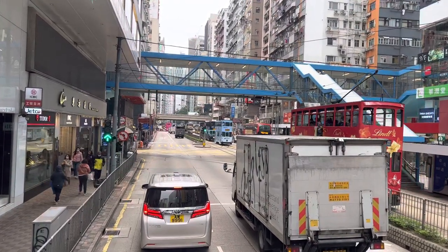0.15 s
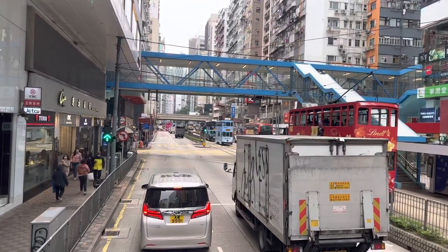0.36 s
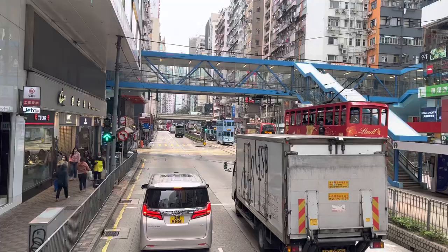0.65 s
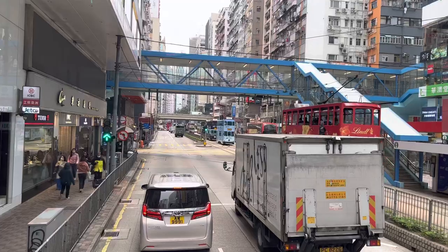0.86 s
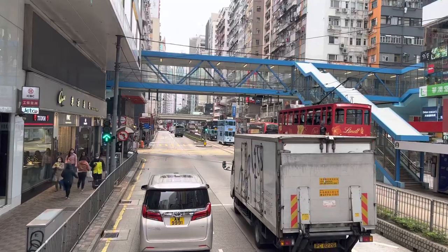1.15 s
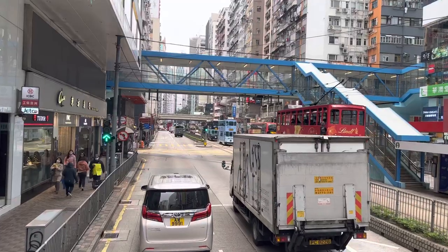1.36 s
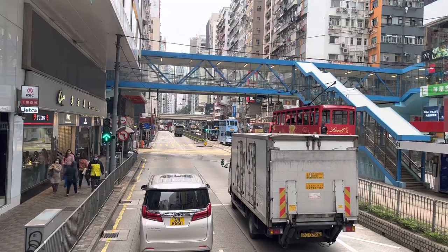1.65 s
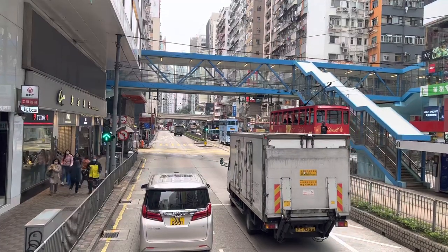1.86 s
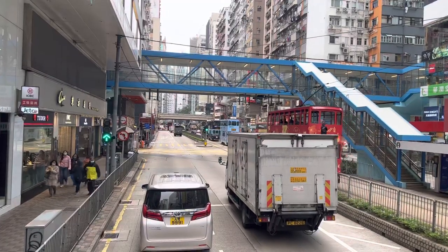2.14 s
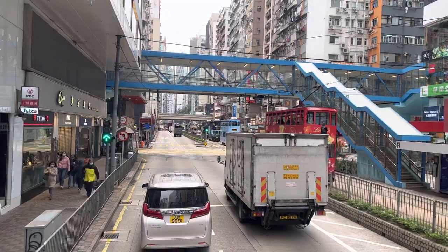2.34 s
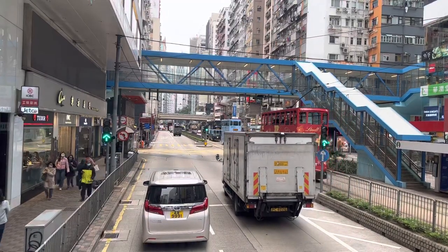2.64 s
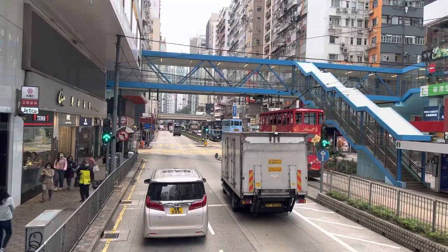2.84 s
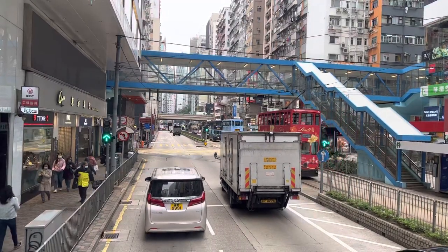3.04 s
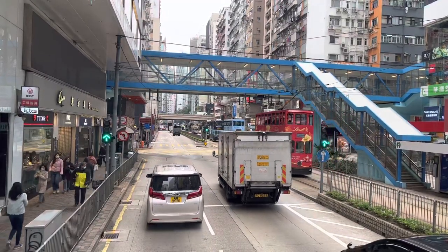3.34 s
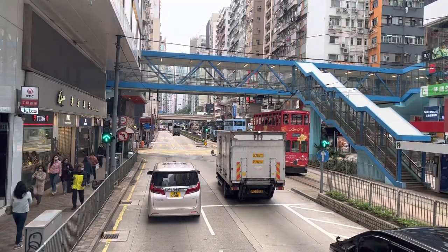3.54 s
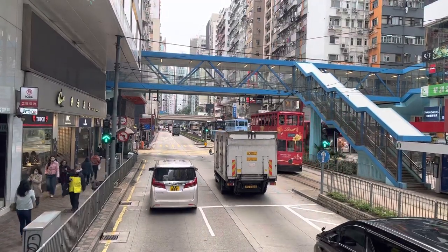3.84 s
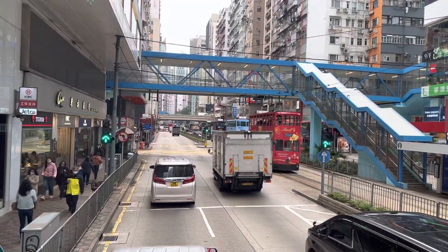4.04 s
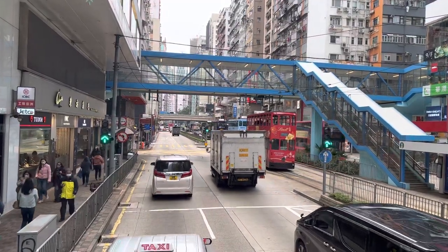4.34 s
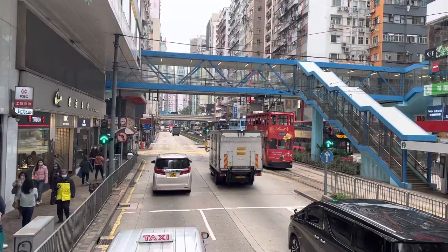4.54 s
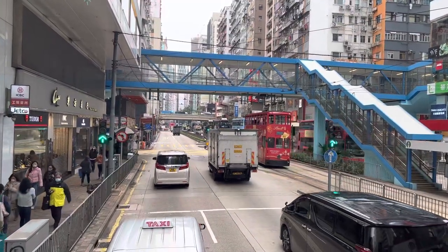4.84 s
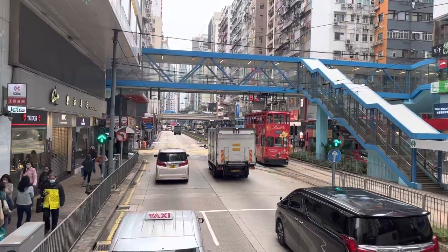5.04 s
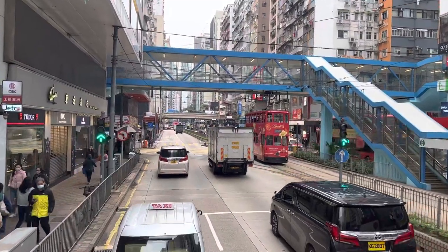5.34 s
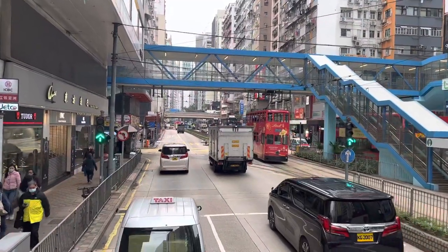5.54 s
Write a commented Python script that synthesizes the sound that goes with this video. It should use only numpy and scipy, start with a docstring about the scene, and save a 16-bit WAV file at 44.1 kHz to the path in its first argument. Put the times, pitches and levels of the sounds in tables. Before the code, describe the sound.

A diesel bus idles, heard from the upper deck behind the windscreen, with a low throbbing rumble, a compressor hum and a thin, whistling air hiss. Right at the start a vehicle horn outside gives a short toot, then a long blast from about 0.3 to 1.6 seconds, with a brief street echo. At about 2.1 seconds an air valve blows off with a short puff, the hum and hiss stop, and the engine revs briefly and settles. Loose trim ticks faintly around 2.8 to 3.3 seconds. From about 3.2 seconds the bus pulls away: the engine gets louder and rises steadily in pitch, booming in the cabin until the end, near 5.7 seconds. Short puffs of air, brighter on the left, come at about 3.7 and 4.2 seconds and several times between 4.7 and 5.3 seconds. A steady wash of street noise lies underneath.

```python
"""Upper deck of a diesel bus at a light, heard by a two-port phone behind the windscreen.
The six-cylinder engine idles, a compressor hums and an air line hisses through a narrow gap.
In the street a horn's diaphragm buzzes twice, short then long. At 2.14 s the air valve blows off
and the engine is blipped; loose trim ticks. From 3.2 s the bus pulls away, its orders sweeping
through cabin resonances that boom, while short air puffs sound, brighter on the left."""
import sys
import numpy as np
from scipy import signal
from scipy.fft import rfft, irfft, next_fast_len
from scipy.io import wavfile
from scipy.ndimage import uniform_filter1d

SR = 44100
rng = np.random.default_rng(int(sys.argv[2]) if len(sys.argv) > 2 else 0)


def put_to_file(sound):
    """Save the sound as 16-bit audio at rate SR, in the file named by the first command-line argument."""
    columns = np.atleast_2d(sound).T  # one column per channel
    safe = np.clip(columns, -1, 1)
    whole_steps = np.round(safe * 32767)
    wavfile.write(sys.argv[1], SR, whole_steps.astype(np.int16))


N = 250929
T = np.arange(N) / SR


# Cabin response: firing rate f/Hz, then level/dB of orders 1, 2 and 4 at an effort of 0 dB
CABIN_BOOM = [(35, -22, -18.5, -42.5), (35.97, -27, -22.5, -35), (37.94, -29.5, -21.5, -25.5),
              (38.05, -24.5, -28.5, -29.5), (39.3, -23.5, -27.5, -26.5), (41.08, -20.5, -22.5, -30),
              (41.13, -17.5, -31.5, -40), (42.7, -20, -36, -37), (45.5, -20.5, -45.5, -31.5),
              (50.14, -19, -44, -30), (50.64, -20.5, -39, -43.5), (54.52, -20, -42.5, -23),
              (56, -21, -40.5, -28.5), (58.3, -21, -37, -32.5), (59.7, -23, -38.5, -29.5),
              (61.5, -22.5, -32, -35.5), (63.1, -24, -44.5, -35)]
def cabin_boom(firing_hz, phase, effort_db):
    """Forced vibration: the cabin answers orders of the firing rate, wavering as combustion varies."""
    rates_hz, *responses_db = np.transpose(sorted(CABIN_BOOM))
    effort_shares, wavers_db = (1.16, 0.59, 0.25), (0.3, 1.2, 1.4)
    boom = 0
    for order, response_db, share, waver_db in zip((1, 2, 4), responses_db, effort_shares, wavers_db):
        db = uniform_filter1d(np.interp(firing_hz, rates_hz, response_db), size=SR // 40)
        db = db + share * effort_db + waver_db * walk(12)
        boom += sine(db, order * phase + 0.065 * walk(4.4))
    return boom


# Weak engine orders: multiple of the firing rate, idling level/dB, pulling level/dB
MINOR_ORDERS = [(2 / 3, -35, -30.5), (4 / 3, -34, -38), (5 / 3, -44, -33.5), (7 / 3, -36.5, -39),
                (5 / 2, -38, -42), (8 / 3, -44.5, -41), (3.3, -40, -46)]
def uneven_cylinders(firing_hz, phase):
    """Cylinders that fire unequally put weak tones between the harmonics of the firing rate."""
    idle_hz, pull_hz = 36, 50
    load = np.clip((firing_hz - idle_hz) / (pull_hz - idle_hz), 0, 1)
    tones = 0
    for order, idle_db, pull_db in MINOR_ORDERS:
        db = idle_db + load * (pull_db - idle_db) + 3.1 * walk(7)
        tones += sine(db, order * phase + rng.uniform(0, 2 * np.pi) + 0.42 * walk(7.7))
    return tones


# Panel resonances: centre f/Hz, width/Hz, peak level/dB
PANEL_MODES = [(91, 17, -27), (203.5, 11.5, -37), (284, 30, -39.5), (234.3, 7, -39.5), (447.2, 17.5, -35.5),
               (327.5, 22, -41.5), (392, 26, -42), (452, 32.5, -43.5)]
def panels(firing_hz, phase):
    """Resonance: each panel sounds while the engine order that drives it crosses its natural frequency."""
    driving_orders = 3 / 2, 5, 16 / 3, 6.5, 8, 9, 8, 7.5
    tones = 0
    for order, (hz, width_hz, db) in zip(driving_orders, PANEL_MODES):
        response = peak(order * firing_hz, hz, width_hz)
        tones += response * sine(db + 0.42 * walk(8.7), order * phase)
    return tones


# Horn harmonics: number, sum level/dB, difference level/dB (of the ports, about the swell), flutter depth
HORN_PARTIALS = [(1, -1.5, -1.5, 0.31), (2, -1.5, 0, 0.48), (3, 3.5, -1.5, 0.17), (4, 6, 5, 0.66),
                 (5, 2.5, -8.5, 0.41), (6, 1.5, -10.5, 0.72), (7, -5, -13.5, 0.83), (8, -10, -21, 0.98),
                 (9, -14, -18.5, 1), (10, -14.5, -28.5, 1.1), (11, -17.5, -19.5, 2.6), (12, -18, -30, 1.6),
                 (13, -22, -51, 1.3), (14, -26.5, -44, 1.4), (16, -27.5, -44.5, 1.6), (17, -29, -49.5, 1.8),
                 (18, -41, -33, 1.8)]
# Echo swells: t/s, then level/dB of partials 1, 2, 3, 4, 5, of 7 and up, and of the port difference
ECHO_SWELLS = [(.09, 19, 12, 16.5, -1, 5, 2.5, 12.5), (.17, 0, 5.5, -9, -2.5, 9, 1.5, 6.5),
               (.27, -8, 13.6, -3, 4.5, 8, 0, 9), (.34, 16, 7.4, 7.5, 0, -7, -1, 6.5),
               (.42, 1.5, 13, 3, 2, 10.5, 2.5, 8.5), (.5, 0, 2.5, 3, -3, 8.5, 0, 10.5),
               (.545, 3, 5.1, -21.5, 1, 10.5, 1, 8.5), (.62, 5, 14, 9, -3, 4, 3, 11),
               (.67, 0, 10, 7.5, 0, 10.5, 3.5, 10), (.76, 0, 11.3, 9, 2, 8.5, 2, 10),
               (.9, -5, 5.3, 9, -2, 5.5, 2, 7.5), (1.0, -1, 6.8, 9, -1, 9.5, 0.5, 8.5),
               (1.1, 0, 8.6, 8.5, 2, 3.5, 1.5, 9), (1.2, 2.5, 8.5, 7, -2.5, 4.5, -2, 10),
               (1.3, 8.5, 6.3, 2.5, 1.5, 1.5, 2, 9.5), (1.42, 2, 6.8, -5.5, -2.5, 0.5, -4, 8.5),
               (1.5, 1, 7.8, 0.5, -7, 6.5, 1.5, 8), (1.6, -4, 8.1, -3, -1.5, 2, -4, 4.5)]
def horn_tone():
    """A periodic diaphragm gives harmonics; interference of street echoes makes them swell apart."""
    pitch_hz, skirt_shift_hz, second_sharp_hz, side_lag_rad = 502.3, 14, 2, 1.3
    n = int(2.5 * SR)  # the horn has died away by then
    *lower_db, upper_db, difference_db = (curve[:n] for curve in curves(ECHO_SWELLS))
    phase = 2 * np.pi * np.cumsum(pitch_hz * (1 + 0.0013 * walk(10, n))) / SR

    def partial(k, db, wander_db, flutter, start):
        """Random modulation surrounds a spectral line with a skirt, here leaning to the sharp side."""
        skirt = walk(90, n) + 1j * walk(90, n) + 0.57 * (walk(350, n) + 1j * walk(350, n))
        skirt *= flutter * np.exp(2j * np.pi * skirt_shift_hz * T[:n])
        detune = (k == 2) * 2 * np.pi * second_sharp_hz * T[:n]
        angle = k * phase + detune + start + 0.82 * walk(8, n)
        amplitude = undb(db + wander_db * walk(18.26, n)) / np.sqrt(1 + 2 * flutter ** 2)
        return amplitude * np.real((1 + skirt) * np.exp(1j * angle))

    mid = side = 0
    for k, mid_db, side_db, flutter in HORN_PARTIALS:
        start = rng.uniform(0, 2 * np.pi)
        swell_db, wander_db = (lower_db[k - 1], 0.7) if k <= 5 else (upper_db * (k > 6), 1.6)
        mid += partial(k, swell_db + mid_db, wander_db, flutter, start)
        side += partial(k, difference_db + side_db, 2.2, 0.55 * flutter, start - side_lag_rad)
    return np.sqrt(2) * np.pad([mid + side, mid - side], ((0, 0), (0, N - n)))


# Presses of the horn: start t/s, duration/s, gain/dB
HORN_PRESSES = [(0.074, 0.177, -40.5), (0.319, 1.258, -41)]
# Spectrum of the horn's rasp: f/Hz, relative level/dB
RASP_SPECTRUM = [(1500, 10.5), (3000, -1), (6500, -9.5), (7500, -18), (8500, -13.5), (9600, -19),
                 (10700, -50.5), (12500, -16), (15500, -37)]
# Transmission through the windscreen: f/Hz, gain/dB
WINDSCREEN = [(1250, 1), (1400, 8), (1507, 3), (1700, -21), (1880, 3.5), (2010, -2)]
def horn(engine_phase):
    """Tone and rasp reverberate outside; the shaking glass filters them and modulates the tone."""
    attack_s, echo_t60_s, rasp_db = 0.071, 0.4, -2.5
    envelope = 0
    for start_s, length_s, db in HORN_PRESSES:
        released_s = np.maximum(T - start_s - length_s, 0)
        envelope += undb(db - 60 * released_s / echo_t60_s) * np.clip((T - start_s) / attack_s, 0, 1)
    tone = horn_tone() * (1 + 0.08 * np.sin(2 * engine_phase))
    rasp = stereo_noise(lambda f: gain_at(RASP_SPECTRUM, f) * (f > 1200))
    return shape(envelope * (tone + undb(rasp_db) * rasp), lambda f: gain_at(WINDSCREEN, f))


# Whistle resonances of the gap: centre f/Hz, width/Hz, relative level/dB
LEAK_MODES = [(2300, 620, 5), (2290, 90, 9), (4170, 60, -2), (4335, 80, 2), (4440, 70, 3), (4590, 100, 6),
              (4745, 50, -2), (4885, 60, 5), (5150, 120, -4), (5590, 80, -3), (6850, 420, -6),
              (8450, 350, -18)]
def air_leak(phase):
    """A jet excites the resonances of a gap, throbbing at each firing; diesel clatter at each firing rings the
    same resonances, until the valve opens."""
    level_db, click_db, valve_s = -55.5, -5, 2.14
    throb_depth, throb_sharpness = 0.2, 3.7
    whistle = lambda f: sum(undb(db) * peak(f, hz, width) for hz, width, db in LEAK_MODES)
    ring = lambda f: sum(undb(db) / (1 + 1.3j * (f - hz) / width) ** 2
                         for hz, width, db in LEAK_MODES[1:10])
    firing = (phase / (2 * np.pi)).astype(int)
    clicks = np.diff(firing, prepend=0) * undb(2 * rng.standard_normal(N // 100))[firing]
    throb = 1 + throb_depth * (2 * np.exp(throb_sharpness * (np.cos(phase) - 1)) - 0.5)
    air = throb * stereo_noise(whistle) + undb(click_db) * unit(shape(clicks, ring))
    return gate(-1, valve_s, fade_s=0.044) * undb(level_db + walk(6.1)) * air


# Air bursts: t/s, tail level/dB, hold/s, tail T60/s, crack re tail/dB, knock level/dB, sizzle level/dB
AIR_PUFFS = [(0.221, -42.5, 0.0072, 0.21, -5, -50, -66), (2.141, -45, 0.01, 0.35, 2, -55, -74),
             (2.66, -55.5, 0.031, 0.36, -9, -57, -74), (3.678, -51.5, 0.0042, 0.27, -7, -54, -75),
             (3.717, -47, 0.019, 0.3, -13, -54, -69), (4.21, -46, 0.011, 0.37, -12, -51, -74),
             (4.671, -50, .01, 0.44, -11, -41, -70), (4.948, -43, 0.011, 0.46, -9, -47, -61),
             (5.046, -46, 0.02, 0.25, -7, -47, -73), (5.245, -41, 0.0098, 0.3, -0.5, -42.5, -65)]
# Spectrum of the escaping air: f/Hz, relative level/dB
PUFF_SPECTRUM = [(880, -44), (1500, -1.5), (1770, 2), (1920, -0.5), (2090, 1.5), (2970, -5), (3310, -4),
                 (4110, -9.5), (4950, -8), (6200, -10.5), (7530, -23), (8560, -14), (10700, -31.5),
                 (11700, -28.5), (15500, -26.5)]
def air_puffs():
    """Compressed air escapes as turbulent noise that rises, holds and decays; the panels knock along."""
    rise_s, crack_t60_s = 0.0097, 0.082
    air = knock = sizzle = 0
    for at_s, db, hold_s, t60_s, crack_db, knock_db, sizzle_db in AIR_PUFFS:
        rise = np.clip((T - at_s + rise_s) / rise_s, 0, 1) ** 2
        decay_s = np.maximum(T - at_s - hold_s, 0)
        envelope = rise * (undb(-60 * decay_s / t60_s) + undb(crack_db - 60 * decay_s / crack_t60_s))
        air += undb(db) * envelope
        knock += undb(knock_db) * envelope
        sizzle += undb(sizzle_db) * envelope
    air = air * stereo_noise(lambda f: gain_at(PUFF_SPECTRUM, f) * (f > 900))
    flicker = undb(walk(150))
    knock = knock * stereo_noise(lambda f: peak(f, hz=1074, width_hz=470, slope=4))
    sizzle = sizzle * stereo_noise(lambda f: peak(f, hz=12130, width_hz=1200, slope=4))
    return flicker * (air + knock + sizzle)


# Runs of the compressor: on t/s, off t/s, level/dB
COMPRESSOR_RUNS = [(.03, .45, -42.5), (0.673, 2.144, -38.5)]
def compressor(phase):
    """A machine locked to the engine hums at a fixed order, six times the firing rate."""
    envelope = sum(gate(on_s, off_s, fade_s=0.1) * undb(db) for on_s, off_s, db in COMPRESSOR_RUNS)
    return envelope * sine(1.5 * walk(5), 6 * phase)


# Fan and pump tones: f/Hz, level/dB, stop t/s
FAN_AND_PUMP = [(452, -44.5, 1.53), (1195, -53.5, 6)]
def fan_and_pump():
    """Rotating machines radiate tones, each wavering in pitch and level."""
    drift_hz = 9
    tones = 0
    for hz, db, stop_s in FAN_AND_PUMP:
        level_db = db + 3.2 * walk(5.09)
        phase = 2 * np.pi * np.cumsum(hz + drift_hz * walk(9)) / SR
        tones += gate(-1, stop_s, fade_s=0.24) * sine(level_db, phase)
    return tones


# Ticks of loose trim, mostly in step with the firings: t/s, starting level/dB
TRIM_TICKS = [(2.8016, -57), (2.8325, -62), (2.8879, -60), (2.9133, -56), (2.9429, -59), (3.081, -62),
              (3.1114, -61), (3.1372, -55), (3.1658, -51), (3.1952, -61), (3.2237, -55), (3.2508, -53),
              (3.2795, -60), (3.3367, -59)]
def loose_trim():
    """Brief impacts give bursts of high treble that decay exponentially within milliseconds."""
    t60_s = 0.0088
    envelope = sum(undb(db - 60 * np.abs(T - s) / t60_s) * (T >= s) for s, db in TRIM_TICKS)
    treble = shape(rng.standard_normal(N), lambda f: peak(f, hz=12700, width_hz=2600, slope=4))
    return envelope * unit(treble)


# Spectra of the low rumble and of the hiss above it: f/Hz, relative level/dB
RUMBLE_SPECTRUM = [(18, -24.5), (30, -7), (60, -6.5), (85, -14.5), (109, -14.5), (335, -18), (387, -23.5),
                   (455, -21), (677, -31), (900, -28.5), (1190, -27.5), (1500, -48.5)]
HISS_SPECTRUM = [(760, -28), (1300, 6.5), (1460, -4), (1630, -6.5), (2580, -10.5), (2830, -13.5),
                 (3520, -17), (5680, -13.5), (7670, -23.5), (9060, -19.5), (10700, -42.5), (12500, -23),
                 (14600, -45), (15500, -37.5)]
# Swell of the street noise, scaled for each band: t/s, level/dB
STREET_SWELL = [(2.0, 2), (2.4, -1), (2.65, -0.5), (3.0, .5), (3.2, 1.5), (3.38, 4.5), (3.52, 3.5),
                (3.68, 1.5), (4.0, 1.5), (4.5, -0.5), (4.78, 1), (4.9, 4), (5.1, 3), (5.3, -0.5),
                (5.55, 2.5)]
def rumble(phase):
    """Broadband noise in three bands swells with the street; each firing modulates it slightly."""
    below = lambda f, hz: 1 / (1 + (f / hz) ** 12)  # power share under a crossover
    low_hz, high_hz = 1400, 3800
    middle_band = lambda f: np.sqrt((1 - below(f, low_hz)) * below(f, high_hz)) * (f > 700)
    low = stereo_noise(lambda f: gain_at(RUMBLE_SPECTRUM, f) * np.sqrt(below(f, low_hz)))
    middle = stereo_noise(lambda f: gain_at(HISS_SPECTRUM, f) * middle_band(f))
    high = stereo_noise(lambda f: gain_at(HISS_SPECTRUM, f) * np.sqrt(1 - below(f, high_hz)))
    swell_db, = curves(STREET_SWELL)
    low *= undb(-29 + 0.28 * swell_db + 0.5 * walk(2.7))
    middle *= undb(-49.5 + 0.56 * swell_db + 0.2 * walk(5.2))
    high *= undb(-63.5 + 1.63 * swell_db + 1.1 * walk(12))
    return (1 + 0.018 * np.cos(phase)) * (low + middle + high)


# Width of the noise field: f/Hz, level/dB of the ports' difference re their sum
FIELD_WIDTH = [(60, -17), (130, -4.5), (290, -10), (640, 1.5), (1200, -4), (1700, 5), (2150, -1),
               (2500, -6), (4000, 1.5), (7000, 0.5), (9500, 1.5), (10800, 14), (11900, 8), (12600, -18),
               (14500, -13), (15300, -3)]
def stereo_noise(gain):
    """Partly coherent noise at two ports: a common part of rms 1 plus an opposed part."""
    mid = shape(rng.standard_normal(N), gain)
    side = shape(rng.standard_normal(N), lambda f: gain(f) * gain_at(FIELD_WIDTH, f))
    return np.array([mid + side, mid - side]) / np.sqrt(np.mean(mid ** 2))


def undb(db):
    """Amplitude ratio of a level."""
    return 10 ** (np.asarray(db) / 20)


def unit(x):
    """Scale to rms 1."""
    return x / np.sqrt(np.mean(x ** 2))


def sine(db, phase):
    """Sinusoid of a given rms level."""
    return np.sqrt(2) * undb(db) * np.sin(phase)


def peak(f, hz, width_hz, slope=2):
    """Bell-shaped gain with its full width taken at half amplitude."""
    return 1 / (1 + (2 * (f - hz) / width_hz) ** slope)


def gate(on_s, off_s, fade_s):
    """1 between two moments, with linear fades."""
    return np.clip(np.minimum(T - on_s, off_s - T) / fade_s + 0.5, 0, 1)


def curves(table):
    """Columns of a table, interpolated linearly in time."""
    times, *columns = np.transpose(table)
    return [np.interp(T, times, column) for column in columns]


def gain_at(spectrum, f):
    """Amplitude gain from (f/Hz, level/dB) points on a log-frequency axis."""
    hz, db = np.transpose(spectrum)
    return undb(np.interp(np.log(f + 1), np.log(hz + 1), db))


def shape(x, gain):
    """Filter by multiplying the spectrum with gain(f)."""
    size = next_fast_len(N + SR // 2)
    f = np.arange(size // 2 + 1) * SR / size
    return irfft(rfft(x, size) * gain(f), size)[..., :N]


def walk(rate_hz, size=N):
    """Random values held for 1 / rate_hz seconds and smoothed twice; spread near 1."""
    hold = max(int(SR / 10 / rate_hz), 1)
    steps = np.repeat(rng.standard_normal(size // 10 // hold + 2), hold)
    smooth = uniform_filter1d(uniform_filter1d(steps, hold), hold)
    return 1.158 * np.interp(np.arange(size) / 10, np.arange(len(smooth)), smooth)


# Idle, blip and pull-away: t/s, firing rate f/Hz, effort level/dB
ENGINE_RUN = [(0, 35.04, -1), (2.03, 35.26, -3), (2.14, 37.03, 2.5), (2.28, 40.3, -4.5), (2.4, 39.24, 3),
              (2.54, 38.33, -18.5), (2.72, 35.83, -5), (2.87, 35.87, -0.5), (3.02, 36.44, 2),
              (3.14, 35.25, -11), (3.23, 36.1, 5.5), (3.38, 39.3, -0.5), (3.46, 40.6, 3.5),
              (3.54, 41.54, 5.5), (3.66, 44.52, 8), (3.9, 48.67, 6), (4.3, 51.7, 5), (4.72, 55.8, 6.5),
              (5.2, 59.04, 7.5), (5.69, 63.68, 7.5)]
def scene():
    """Superposition of all sources; the bass of the bus reaches the left port late."""
    firing_hz, effort_db = curves(ENGINE_RUN)
    phase = 2 * np.pi * np.cumsum(firing_hz) / SR
    engine = cabin_boom(firing_hz, phase, effort_db) + uneven_cylinders(firing_hz, phase)
    bus = engine + panels(firing_hz, phase) + compressor(phase) + fan_and_pump() + rumble(phase)
    left_lag_s, lag_corner_hz = 0.00024, 900
    lag = lambda f: np.exp(-2j * np.pi * np.outer([left_lag_s, 0], f / (1 + (f / lag_corner_hz) ** 2)))
    return shape(bus, lag) + horn(phase) + air_leak(phase) + air_puffs() + loose_trim()


# Imbalance of the microphone ports: f/Hz, left minus right level/dB
PORT_BALANCE = [(60, 1), (110, 5), (200, 2.5), (380, 0.5), (700, -2), (1290, 2.5), (2380, -1), (4400, 8),
                (8120, 9.5), (15000, -8.5)]
def record(dry):
    """Two band-limited ports with unequal frequency responses; the left favours the treble."""
    bottom_hz, top_hz = 27, 15700
    balance = lambda f: gain_at(PORT_BALANCE, f) ** np.array([[0.5], [-0.5]])
    ports = shape(dry, lambda f: balance(f) / np.sqrt(1 + (bottom_hz / (f + 1)) ** 8))
    return signal.sosfilt(signal.ellip(10, 0.2, 70, top_hz, fs=SR, output="sos"), ports)


dry = scene()
out = record(dry)
put_to_file(out)
```